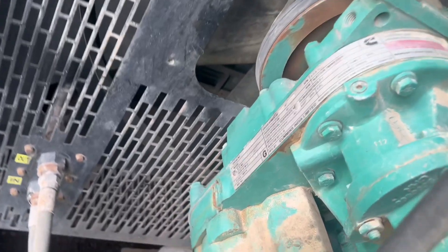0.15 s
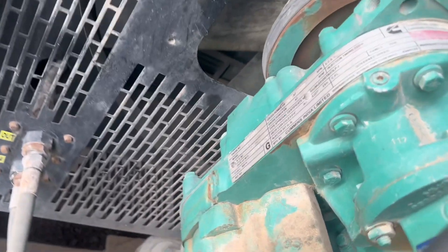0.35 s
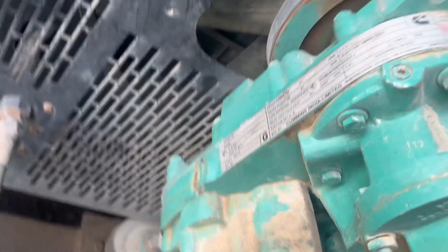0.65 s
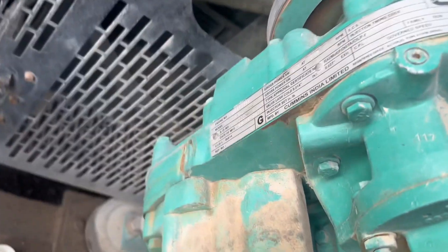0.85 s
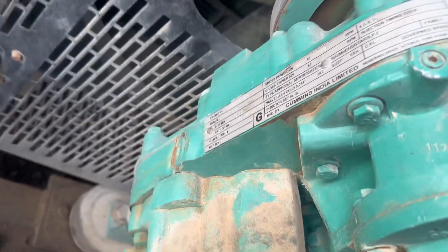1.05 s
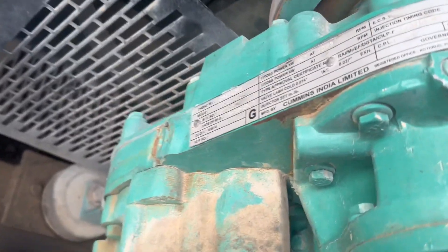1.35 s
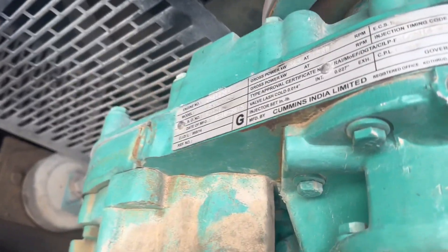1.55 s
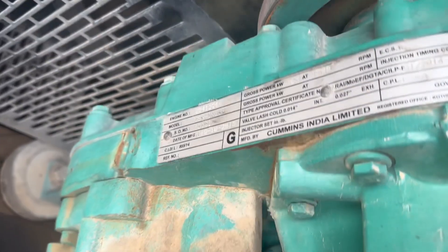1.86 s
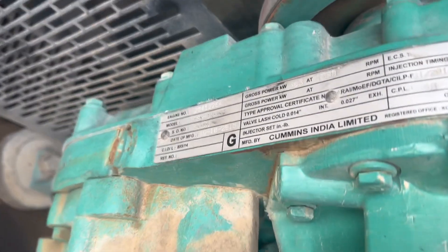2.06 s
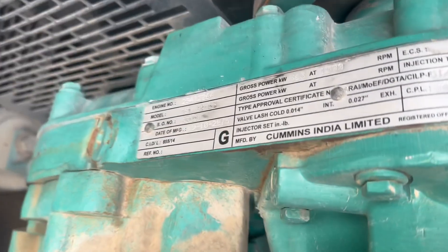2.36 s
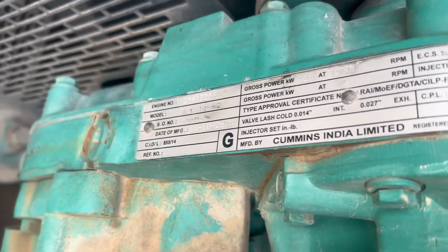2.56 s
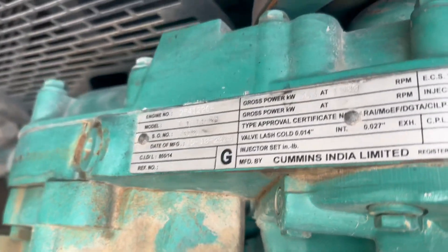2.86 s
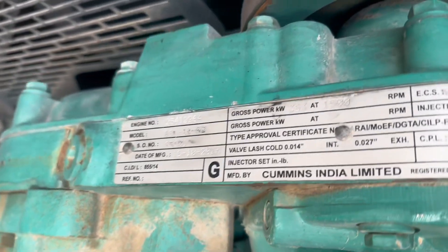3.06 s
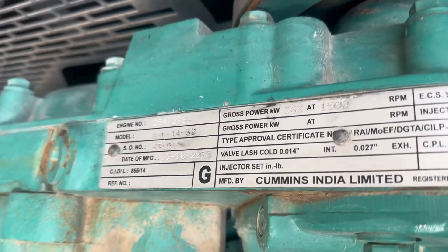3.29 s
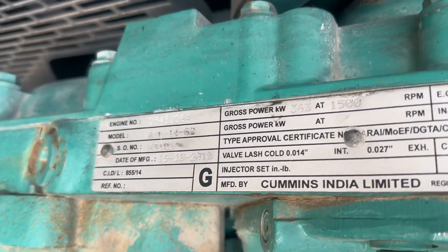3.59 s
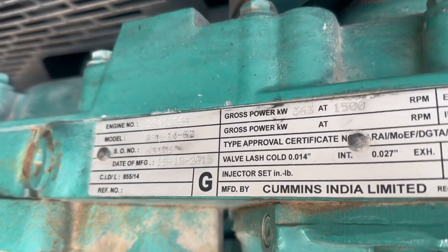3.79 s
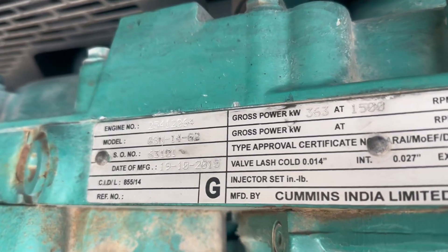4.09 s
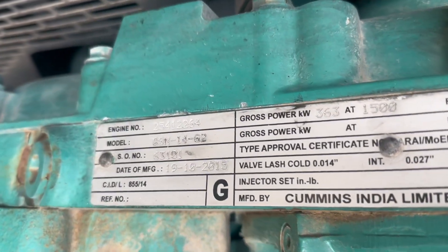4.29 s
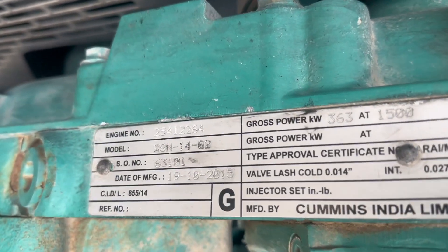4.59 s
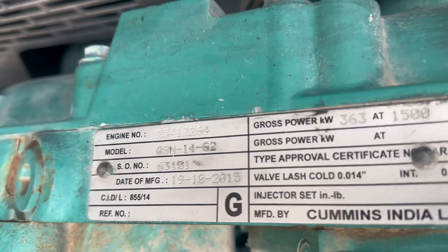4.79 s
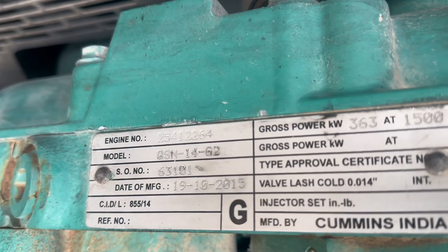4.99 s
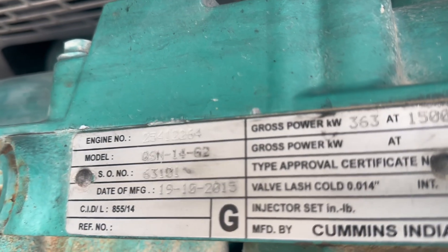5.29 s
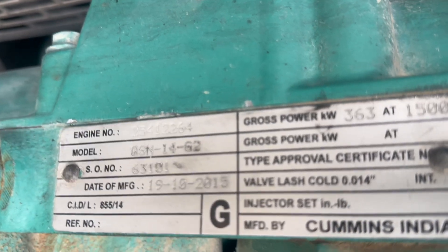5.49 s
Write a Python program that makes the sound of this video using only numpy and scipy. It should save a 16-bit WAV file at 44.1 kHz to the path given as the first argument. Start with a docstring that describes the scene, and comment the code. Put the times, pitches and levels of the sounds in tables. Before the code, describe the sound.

A big diesel generator runs at constant speed, heard close up on a moving hand-held stereo microphone. A strong deep bass tone dominates, slowly beating with fan hum, under a rough roar. Mid hums swell and fade between sides; breathy whistles come and go. Small chirps appear near the start, and soft scratchy scuffs around two and a half seconds.

```python
"""A large six-cylinder diesel generator at governed speed, heard from a moving hand-held stereo microphone.
Its engine cycle repeats 15 times a second and so gives sharp tones on multiples of 15 Hz.
Uneven combustion and cooling air fill in a roar of shaped noise, coloured by resonance and reflection.
A slightly slower fan motor beats against the low tones, and further hums swell and fade. Narrow noise bands
whistle in the treble over a faint high electronic whine, with a few husky chirps and noisy scuffs nearby."""
import sys
import numpy as np
from scipy import signal
from scipy.fft import rfft, irfft, next_fast_len
from scipy.io import wavfile

SR = 44100
rng = np.random.default_rng(int(sys.argv[2]) if len(sys.argv) > 2 else 0)


def dump(signal):
    """Clip the signal to [-1, 1] and save it as 16-bit WAV at the path in sys.argv[1]."""
    limited = np.clip(np.atleast_2d(signal).T, -1, 1)
    pcm = np.round(limited * 32767).astype(np.int16)
    wavfile.write(sys.argv[1], SR, pcm)


N = 248724
TIME = np.arange(N) / SR
CYCLE_HZ = 15.0  # four-stroke cycles a second, six firings each
# sign of each channel in a left-right difference: rows (left), (right)
SIDES = np.array([[1], [-1]])


def from_db(db):
    """Level law: 20 dB is a factor of ten in amplitude."""
    return 10 ** (np.asarray(db) / 20)


def rms_one(x):
    """Normalisation to unit effective value."""
    return x / np.sqrt(np.mean(x ** 2) + 1e-20)


def in_time(rows):
    """Linear interpolation of each column over the time in the first."""
    s, *columns = np.transpose(rows)
    return [np.interp(TIME, s, column) for column in columns]


def drift(rate_hz):
    """Low-passed noise: a random curve of rms about 1, made at every 40th sample by two equal poles."""
    pole = np.exp(-2 * np.pi * rate_hz * 40 / SR)
    noise = rng.standard_normal(N // 40 + 3002)
    slow = signal.lfilter([1], [1, -2 * pole, pole ** 2], noise)[3000:]  # settled part
    slow = rms_one(slow - slow.mean())
    return np.interp(np.arange(N) / 40, np.arange(len(slow)), slow)


def tone(phase, lead):
    """Interaural phase: a stereo sine of rms 1 with a random start, the left leading by lead [rad]."""
    start = rng.uniform(0, 2 * np.pi)
    return np.sqrt(2) * np.sin(phase + start + SIDES * lead / 2)


def rough_tone(hz, half_width_hz):
    """Quadrature modulation: two slow noises on sine and cosine make a narrow band that follows a pitch."""
    phase = 2 * np.pi * np.cumsum(hz) / SR
    return drift(half_width_hz) * np.sin(phase) + drift(half_width_hz) * np.cos(phase)


def glide(start, length, first_hz, last_hz, bend):
    """Exponential approach: the elapsed share of an event, and a pitch that moves fastest at first."""
    part = np.clip((TIME - start) / length, 0, 1)
    moved = (1 - np.exp(-bend * part)) / (1 - np.exp(-bend))
    return part, first_hz + (last_hz - first_hz) * moved


def scuffs():
    """Friction noise: bright bursts with a quick rise, an exponential decay and some extra high treble."""
    # scuffs and a tick close to the microphone: (peak time [s], rise time constant [s], T60 [s],
    # low edge [Hz], high edge [Hz], body level [dB], highest treble relative to body [dB])
    scuff_rows = [(1.74, .02, .15, 6000, 10000, -79, -12), (1.92, .01, .1, 5500, 8500, -78, -14),
                  (2.254, .006, .17, 6000, 10000, -67, -9), (2.401, .006, .22, 3000, 10300, -57, -13),
                  (2.438, .008, .2, 4500, 10000, -68, -14), (3.695, .002, .08, 5200, 7600, -61, -24)]
    out = np.zeros((2, N))
    for peak, rise, t60, low_hz, high_hz, level_db, top_db in scuff_rows:
        after = TIME - peak
        envelope = np.exp(np.minimum(after / rise, -np.log(1000) * after / t60))
        scratch = from_db(2.5 * drift(200) + .8 * drift(35))
        noise = rng.standard_normal(N) + 0.12 * rng.standard_normal((2, N))  # mostly shared by both sides
        band_pass = signal.butter(4, [low_hz, high_hz], "band", fs=SR, output="sos")
        body = signal.sosfilt(band_pass, noise)
        body = signal.lfilter([1], [1, -.7], body)  # duller towards the top
        top = signal.sosfilt(signal.butter(4, 12500, "high", fs=SR, output="sos"), noise)
        burst = rms_one(body) + from_db(top_db) * rms_one(top)
        out += from_db(level_db) * envelope * scratch * burst
    return out


def chirps():
    """Frequency glide: a clear core in a noisy band moves, mostly down, under a rounded swell."""
    # short husky notes: (start [s], length [s], start pitch [Hz], end pitch [Hz], bend [1],
    # half width [Hz], gain [dB], left minus right [dB])
    chirp_rows = [(.722, .045, 4780, 4700, 1, 80, -61, -1.5), (.725, .05, 4450, 4200, 1, 200, -66, -1.5),
                  (.765, .04, 3950, 3700, 1, 120, -60, 0), (.772, .04, 3450, 3200, 1, 160, -59, 0),
                  (.79, .05, 3150, 2800, 2, 220, -56, 0), (.84, .065, 2950, 3000, 1, 110, -60, 0),
                  (1.09, .05, 4200, 3300, 1.5, 400, -64, -2.5),
                  (2.165, .095, 6400, 4800, 2.5, 300, -63.5, 3), (2.26, .026, 7900, 7850, 1, 120, -67.5, 0),
                  (4.26, .08, 4100, 3300, 1.5, 400, -66, 3), (4.54, .16, 4500, 3300, 3.5, 500, -59.5, 4),
                  (4.93, .075, 5850, 4800, 1.2, 420, -65, 3)]
    out = np.zeros((2, N))
    for start, length, first_hz, last_hz, bend, half_width_hz, gain_db, balance_db in chirp_rows:
        part, hz = glide(start, length, first_hz, last_hz, bend)
        core = tone(2 * np.pi * np.cumsum(hz) / SR, 0)
        note = .9 * rough_tone(hz, half_width_hz) + .27 * core
        swell = np.sqrt(np.sin(np.pi * part ** .7).clip(0))
        out += from_db(gain_db + SIDES * balance_db / 2) * note * swell
    return out


def whistle(hz, half_width_hz, level_db, balance_db):
    """Partial coherence: a shared narrow band plus one of opposite sign in the two sides, with flutter."""
    shared = rough_tone(hz, half_width_hz)
    opposed = .6 * SIDES * rough_tone(hz, half_width_hz)
    return from_db(level_db + drift(9) + SIDES * balance_db / 2) * (shared + opposed)


def whistles():
    """Narrow-band flow noise: one lasting whistle and several passing ones that fade in and out."""
    # the hissy whistle that never stops: (time [s], pitch [Hz], level of the shared band [dB])
    lasting_rows = [(0, 2900, -68), (.9, 2950, -65), (1.4, 2900, -67), (1.65, 2900, -66), (1.9, 3020, -63),
                    (2.4, 2970, -61.5), (2.85, 3000, -62), (3.05, 2900, -75), (3.9, 2800, -72),
                    (4.25, 2820, -63.5), (4.6, 2880, -67), (4.8, 2910, -64.5), (5.4, 2910, -63.5),
                    (5.64, 2900, -67)]
    # air in narrow gaps that comes and goes: (start [s], length [s], start pitch [Hz], end pitch [Hz],
    # bend [1], half width [Hz], start and end level of the shared band [dB], left minus right [dB])
    passing_rows = [(-.2, 1.1, 6700, 6000, 1.6, 130, -72.5, -78, 5),
                    (.7, 1.6, 6020, 5480, 2.4, 70, -81, -80, 4),
                    (.15, 0.63, 2413, 2446, .1, 50, -64.5, -68.5, -2),
                    (1.051, 2.0, 4300, 4300, .1, 100, -75, -76, -1),
                    (2.9, 2.8, 6170, 6020, .8, 80, -74.5, -78, 4.5),
                    (4.2, 1.5, 4150, 4600, .5, 170, -73, -69, -3.5),
                    (2.15, .8, 2800, 2860, .1, 90, -66, -64, -3),
                    (1.75, .9, 6100, 6100, .1, 120, -78, -79, 4)]
    fade_s = 0.056
    hz, level_db = in_time(lasting_rows)
    out = whistle(hz, 105, level_db, -3)
    for start, length, first_hz, last_hz, bend, half_width_hz, first_db, last_db, balance_db in passing_rows:
        part, hz = glide(start, length, first_hz, last_hz, bend)
        fade = np.clip(np.minimum(part, 1 - part) * length / fade_s, 0, 1)
        level_db = first_db + (last_db - first_db) * part
        out += fade * whistle(hz, half_width_hz, level_db, balance_db)
    return out


def hums():
    """Standing waves: gear, fan and alternator tones vary in level and phase with the listening spot."""
    # (pitch [Hz], left lead at start [rad], at middle [rad], at end [rad])
    hum_rows = [(215.3, .3, 4.2, 5.5), (450, -1.6, -.45, -.15), (600, -.8, -.3, -.15), (960, 1.7, .5, .8),
                (1215, 1.6, 1.4, 1.3), (2880, .5, -.5, -1), (66.4, 0, 0, 0), (71.9, 0, 0, 0)]
    # spots of the standing wave that each side crosses; per hum, for left and for right (or once for both):
    # (usual level [dB], spots as (time crossed [s], change there [dB], half width [s]))
    spot_rows = [
        [(-43, [(1.6, -13, .5), (2.7, -10, .9)]), (-42.5, [(1.6, -12, .5), (2.6, -8, .8)])],
        [(-41, [(.1, -14, 1.0), (5.6, -2, 1.2)]), (-45, [(0, 2, .4), (1.4, -1.7, .9), (5.5, -3.5, .9)])],
        [(-58.5, [(1.05, -17, 0.65)]), (-59.5, [(0.55, -15, 0.5), (1.4, -5, .5)])],
        [(-51, [(1.9, -17, 1.7), (3.0, -5, .4)]), (-52.5, [(.9, -15, 0.4), (.2, -4, .4), (1.5, -6, .4),
         (2.5, -3, .6), (4.7, 1.5, .6)])],
        [(-59, [(.2, -6, .4), (2.0, 3, .35), (4.3, -3, .5), (1.2, -8, .4), (3.0, -5.5, 0.7)]),
         (-54, [(.95, -16, .3), (1.45, -8, .3), (3.1, -6, .5), (4.4, -7, 1.3)])],
        [(-75, [(1.5, -5, 2), (4, -10, .5)]), (-67, [(.3, -12, 1.2), (2.9, -8, 1.6)])],
        [(-48, [(2.5, -3, 1)])] * 2,
        [(-47.5, [(1.5, -3, 1)])] * 2,
    ]
    out = np.zeros((2, N))
    for (hz, *leads), sides in zip(hum_rows, spot_rows):
        level_db = []
        for usual_db, spots in sides:
            change_db = sum(db * np.exp(-((TIME - s) / width) ** 2) for s, db, width in spots)
            level_db.append(usual_db + change_db)
        lead = np.interp(TIME, [0, TIME[-1] / 2, TIME[-1]], leads)
        out += from_db(level_db) * tone(2 * np.pi * hz * TIME, lead)
    return out


def fan():
    """Beats: harmonics of the fan motor lie just below engine tones and slowly interfere with them."""
    # multiple of a turn [1]: level [dB]
    fan_rows = {2: -40, 3: -45.5, 5: -42, 8: -58}
    turns_hz = 29.6  # just under twice the cycle rate
    out = np.zeros((2, N))
    for multiple, level_db in fan_rows.items():
        phase = 2 * np.pi * multiple * turns_hz * TIME
        out += from_db(level_db + .9 * drift(0.62)) * tone(phase, 0)
    return out


def reflected(x):
    """Comb filtering: delayed copies with slowly swaying delays make ridges wander through the noise."""
    # nearby metal faces; the detour changes as the hand moves:
    # (left delay [ms], right delay [ms], sway [ms], level [dB])
    face_rows = [(1.7, 1.92, 0.14, -15), (3.4, 3.1, 0.13, -10.5), (7.3, 7.7, .2, -10),
                 (13.1, 12.2, 0.29, -11.5)]
    out, at = x.copy(), np.arange(N)
    for left_ms, right_ms, sway_ms, level_db in face_rows:
        sway = sway_ms * drift(.3)
        for side, ms in enumerate((left_ms, right_ms)):
            delay = (ms + sway) * SR / 1000
            out[side] += from_db(level_db) * np.interp(at - delay, at, x[side])
    return out


def hollowed(x):
    """Interference: bands where direct and reflected sound cancel or add dip or rise for a while."""
    # most stay at one pitch, a few slide slowly: (middle [s], half length [s], pitch at the middle [Hz],
    # slide [Hz/s], half width [Hz], change [dB])
    hollow_rows = [(.5, .8, 285, 0, 35, -3), (3.3, .6, 295, 0, 35, 2), (1.0, .5, 1550, 0, 250, -1.5),
                   (2.0, .35, 1550, 0, 250, 1.5), (3.0, .4, 1550, 0, 250, -1.5),
                   (4.3, .4, 5500, 0, 400, -2), (.6, 1.0, 1120, 0, 90, -3), (.4, .7, 1900, 0, 200, -2),
                   (3.75, 1.3, 1890, 120, 100, -7), (5.2, 1.2, 1430, 30, 160, 1.5),
                   (2.7, .4, 2150, 0, 60, 4), (1.3, 1.0, 5100, 0, 350, -3), (3.6, .7, 3200, 30, 120, -5),
                   (5.0, .35, 3750, 0, 300, -5), (3.9, .8, 4800, 150, 300, -3.5),
                   (.9, 1.0, 7600, 0, 400, -4), (4.9, .9, 6750, 350, 200, 4), (5.1, .6, 8300, 0, 350, 4),
                   (1.2, .7, 1350, 0, 120, -3), (4.4, .7, 170, 0, 25, -4), (2.5, .4, 2650, 150, 70, -5),
                   (3.75, .15, 3100, 1800, 120, -6), (1.0, .7, 1050, 0, 150, -2)]
    hz, s, frames = signal.stft(x, SR, nperseg=2048)
    change_db = 0
    for middle, half_s, centre_hz, slide, half_width_hz, db in hollow_rows:
        after = s - middle
        off_centre = (hz[:, None] - centre_hz - slide * after) / half_width_hz
        change_db = change_db + db * np.exp(-(after / half_s) ** 4 - off_centre ** 2)
    return signal.istft(frames * from_db(change_db), SR, nperseg=2048)[1][:, :N]


def roar(repeat_db, patchy_db):
    """Broadband noise of uneven combustion and cooling air; above 500 Hz a share repeats with each cycle."""
    # base spectrum: (frequency [Hz], level per Hz [dB], left minus right [dB],
    # unshared relative to shared part [dB], left lead [rad])
    spectrum_rows = [(12, -84, 0, -33, 0), (32, -70, 0, -30, 0), (60, -55.5, 0, -29, 0),
                     (150, -58.5, .2, -25, .05), (170, -63, 0, -14, .1), (300, -67, .5, -9, 0),
                     (400, -73, 5, -8, -.3), (800, -79, 1.5, -6, .3), (1600, -81, -5, -4, 2.1),
                     (1800, -87, -4, -4, 1.5), (3000, -91, -3, -4, -.1), (6500, -105, 2.5, -4, .6),
                     (9700, -124, 1.5, -3, .1), (10300, -138, 0, -3, 0)]
    # broad resonances and dips of block and housing: (frequency [Hz], width [Hz], change [dB])
    housing_rows = [(70, 25, 3.5), (118, 2.6, -8.5), (140, 16, 3.5), (168, 11, -5), (190, 13, -3),
                    (215.5, 27, 5), (315, 11, 3.5), (446.4, 33, 4), (714, 210, 3.5), (780, 19, 3.5),
                    (890, 92, 3.5), (1092, 140, 4.5), (1380, 545, 5), (1980, 470, 2)]
    # the microphone closes in on the block: (time [s], nearness 0 to 1 [1])
    nearness_rows = [(0, 0.43), (1.4, 0.1), (2.6, 0.1), (3.6, .35), (4.8, .95), (5.64, 0.8)]
    # gain far from and near the block, rows for low-mid, mid, upper, treble: (far [dB], near [dB])
    far_near_rows = [(-2, -1.5), (-2, -0.9), (0.9, 2), (1.5, 2.5)]

    size, period = next_fast_len(N), round(SR / CYCLE_HZ)
    hz = np.maximum(np.arange(size // 2 + 1) * SR / size, 1)
    points = np.transpose(spectrum_rows)
    level_db, balance_db, unshared_db, lead = (
        np.interp(np.log(hz), np.log(points[0]), column) for column in points[1:])
    for centre_hz, width_hz, peak_db in housing_rows:
        level_db = level_db + peak_db / (1 + (2 * (hz - centre_hz) / width_hz) ** 2)

    # valve clatter: one period of noise, repeated exactly
    clatter = np.tile(rng.standard_normal((2, period)), size // period + 1)[:, :size]
    noise = rfft(rng.standard_normal((2, size)))
    shared, unshared = noise + from_db(repeat_db) * rfft(clatter) * (hz > 500)
    both = shared * np.exp(.5j * SIDES * lead) + SIDES * from_db(unshared_db) * unshared
    both = both / np.sqrt(1 + from_db(2 * unshared_db))
    both = both * from_db(level_db + SIDES * balance_db / 2) / np.sqrt(2 / SR)  # level per Hz

    # third-octave bands flicker on their own; those above 170 Hz also follow the nearness
    edges = 8 * 2 ** np.arange(0, 11, 1 / 3)
    nearness = in_time(nearness_rows)[0]
    zone_db = [0] + [far_db + (near_db - far_db) * nearness for far_db, near_db in far_near_rows]
    low_roar, high_roar = np.zeros((2, 2, N))
    for low, high in zip(edges, edges[1:]):
        zone = np.searchsorted([170, 420, 1500, 3500], low)
        band = irfft(both * ((hz >= low) & (hz < high)), size)[:, :N]
        flicker_db = patchy_db * (drift(4) + drift(30))
        target = high_roar if zone > 1 else low_roar
        target += band * from_db(zone_db[zone] + flicker_db)

    # the low roar narrows towards the centre as the microphone turns to face the block
    centre = low_roar.mean(axis=0)
    low_roar = centre + (low_roar - centre) * from_db(np.linspace(3, -3, N))
    return hollowed(low_roar + from_db(-2.5) * reflected(high_roar))


def cycle_tones():
    """Harmonic series: engine tones on multiples of the cycle rate waver a little, under a faint high whine."""
    # multiples 634 and 646 are a faint high electronic whine;
    # multiple of the cycle rate [1]: (level [dB], waver [dB], left minus right [dB], left lead [rad])
    order_rows = {2: (-58, .3, 0, 0), 3: (-46.5, .5, 0, 0), 4: (-42.5, .5, 0, 0), 5: (-44.5, 1.0, -.2, 0),
                  6: (-22.5, .1, -.2, .05), 7: (-53, 1.5, .4, .1), 8: (-47, 1, .5, .1),
                  9: (-38, .8, .7, .1), 10: (-43, .8, .4, .04), 12: (-52.5, 1.5, -3.7, .1),
                  13: (-57, 2, -1, .3), 15: (-58, 2, -1, -.3), 16: (-58, 2, 0, 0), 17: (-52, 1.5, .3, 0),
                  18: (-56, 2, 3, .5), 19: (-55, 2.5, -1, .3), 20: (-59, 2, 2, -.1), 57: (-65, 1, 0, 0),
                  63: (-66, 3, -1, -1.3), 78: (-67.5, 2.4, 0, 2), 96: (-66, .5, -5, -2.8),
                  143: (-73, 3, -5, 1.5), 634: (-94.5, 1.5, 2, 0), 646: (-93.5, 3, 2, 0)}
    out = np.zeros((2, N))
    for multiple, (level_db, waver_db, balance_db, lead) in order_rows.items():
        level = from_db(level_db + SIDES * balance_db / 2 + waver_db * drift(1.2))
        out += level * tone(2 * np.pi * multiple * CYCLE_HZ * TIME, lead)
    return out


def scene():
    """Superposition: the small sounds, hums, fan, roar and engine tones add linearly."""
    surroundings = scuffs() + chirps() + whistles()
    return surroundings + hums() + fan() + roar(repeat_db=-8, patchy_db=.85) + cycle_tones()


def record(dry):
    """Wavelength against spacing: close-set microphones hear deep bass alike; hiss is added, the top cut."""
    mid, side = (dry[0] + dry[1]) / 2, (dry[0] - dry[1]) / 2
    side = signal.sosfilt(signal.butter(2, 30, "high", fs=SR, output="sos"), side)
    self_noise = from_db(-90.5) * rng.standard_normal(dry.shape)
    self_noise = signal.sosfilt(signal.butter(4, 12000, "high", fs=SR, output="sos"), self_noise)
    top_cut = signal.cheby2(24, 60, 15800, fs=SR, output="sos")
    return signal.sosfilt(top_cut, mid + SIDES * side + self_noise)


dry = scene()
out = record(dry)
dump(out)
```